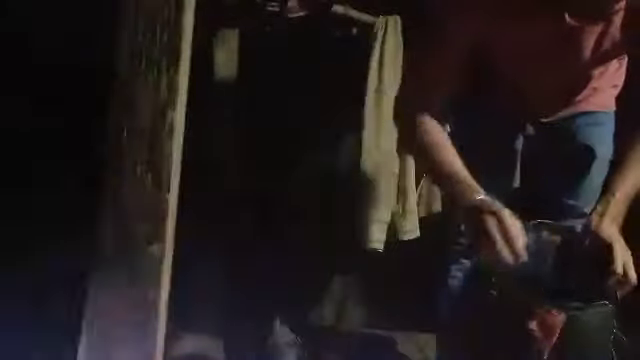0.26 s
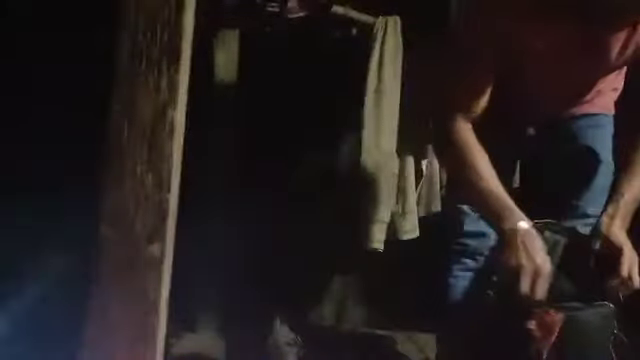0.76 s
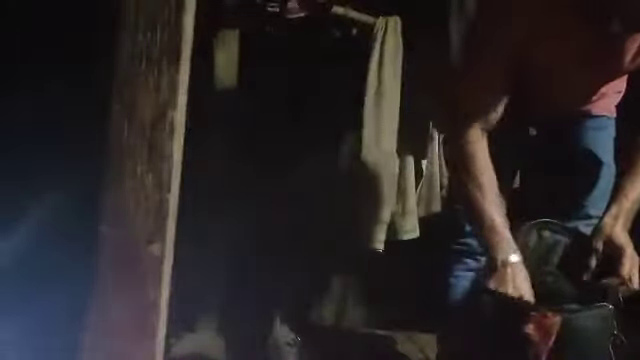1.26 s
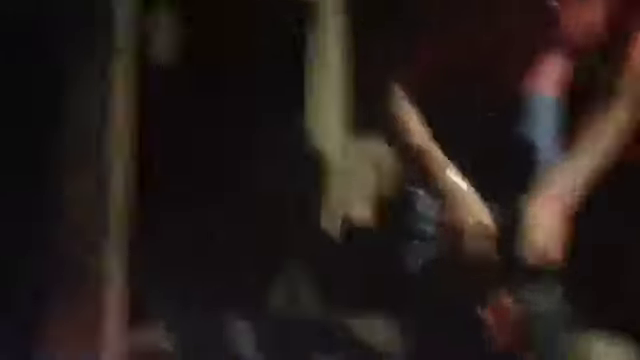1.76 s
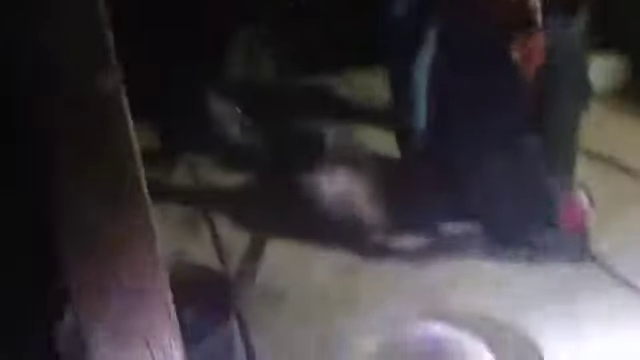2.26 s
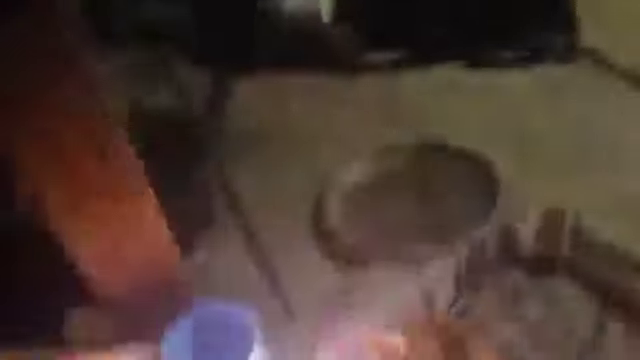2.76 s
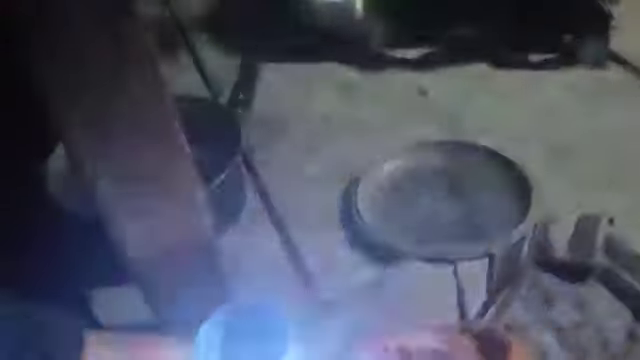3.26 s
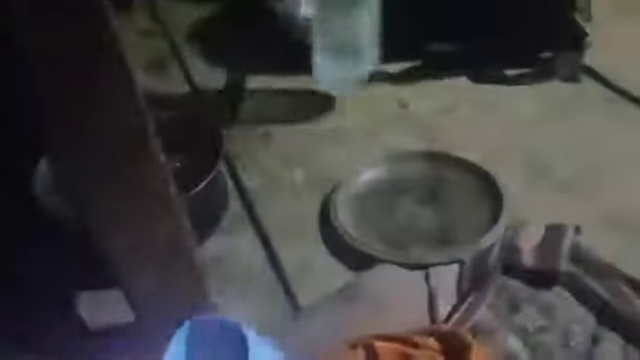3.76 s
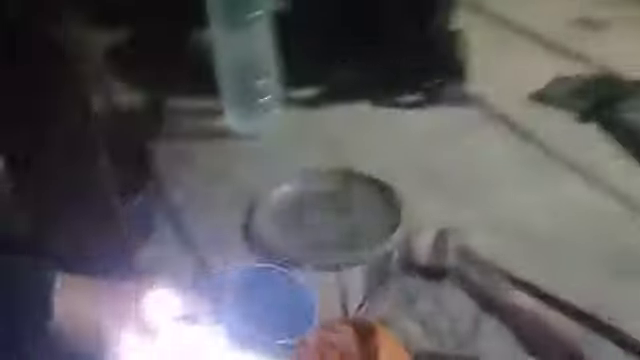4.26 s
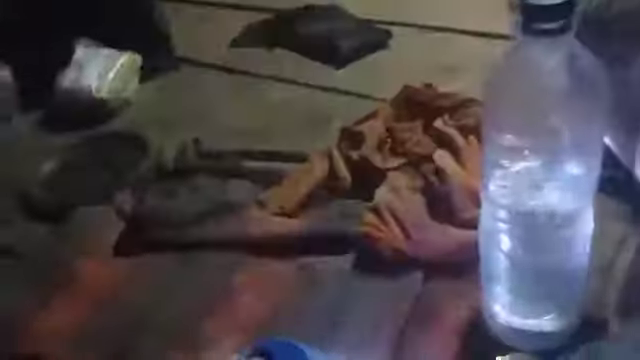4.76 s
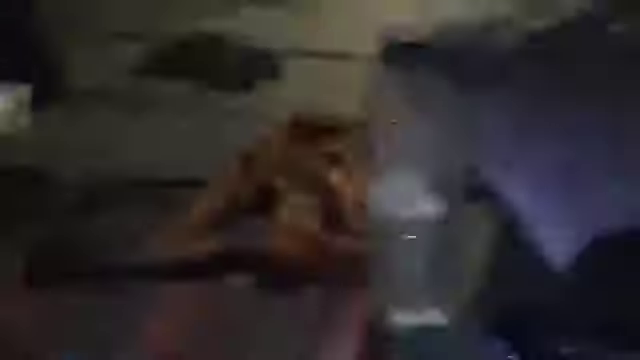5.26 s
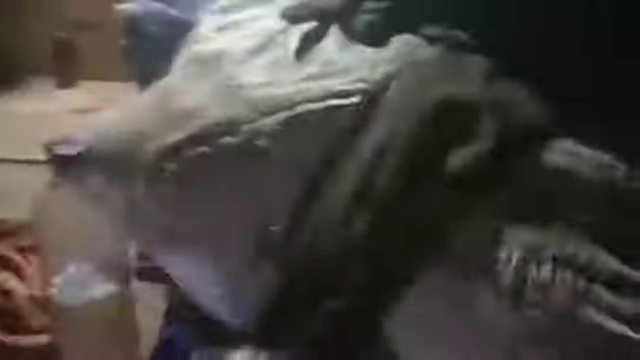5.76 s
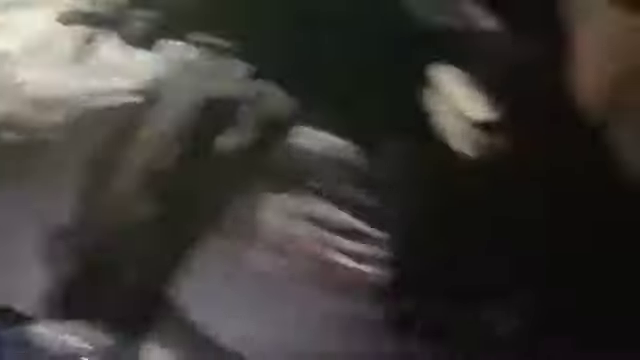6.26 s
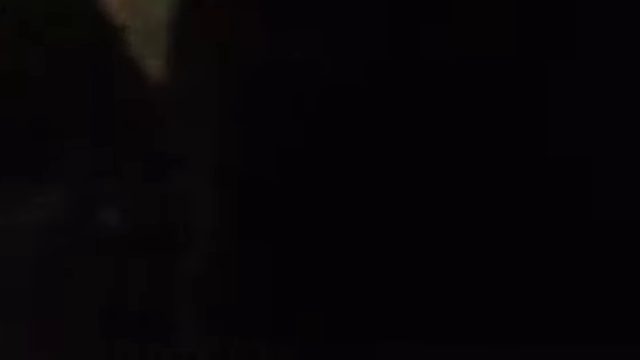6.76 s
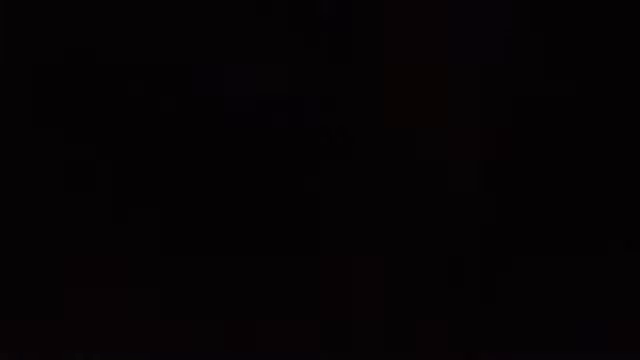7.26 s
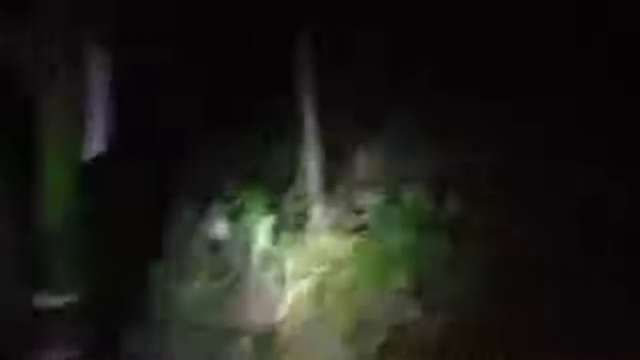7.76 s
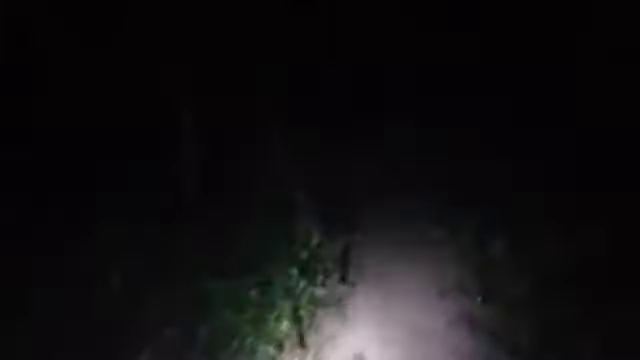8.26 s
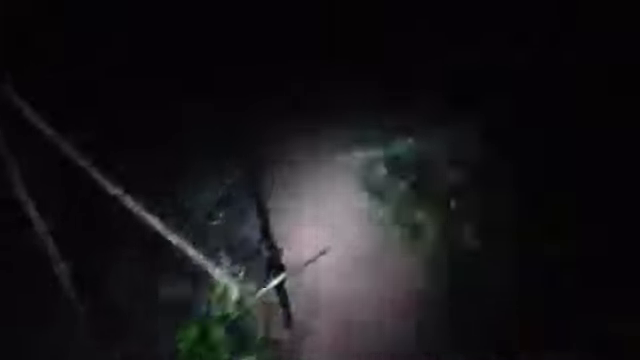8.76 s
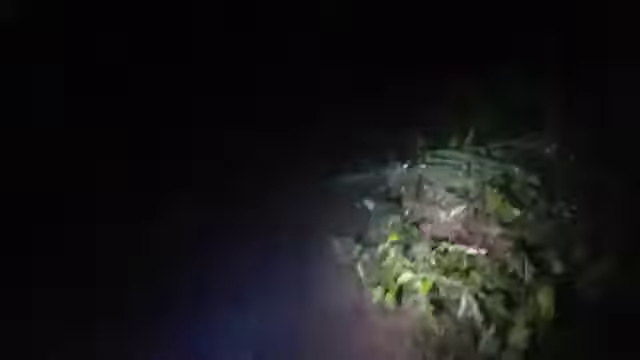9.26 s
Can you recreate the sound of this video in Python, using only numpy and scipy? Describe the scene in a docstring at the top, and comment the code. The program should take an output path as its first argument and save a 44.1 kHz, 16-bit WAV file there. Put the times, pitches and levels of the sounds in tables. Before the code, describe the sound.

A steady chorus of night insects continues behind small bumps on a hand-held microphone, cloth rustles, a metallic clack and a dull thump.

```python
"""Crickets at a forest hut by night

A chorus of wavering tones beats into a trill; half way through it gives way to a higher, quicker and
quieter one. Other crickets chirp in threes, each wing stroke a falling sweep. Close by, a bag and
clothes rustle by friction, feet scuff, and impacts set the wooden floor, a metal utensil and the case
of a hand-held camera ringing in their damped modes, while the hand rubs the case into a low rumble."""
import sys
import numpy as np
from scipy import signal
from scipy.fft import rfft, irfft, next_fast_len
from scipy.io import wavfile
from scipy.ndimage import uniform_filter1d

SR = 44100
rng = np.random.default_rng(int(sys.argv[2]) if len(sys.argv) > 2 else 0)


def inscribe(sig):
    """Save sig as 16-bit PCM at rate SR to the path in sys.argv[1].

    A 1-D sig is mono; a 2-D sig holds one channel per row.
    Samples are clipped to [-1, 1] before scaling.
    """
    pcm = np.round(np.clip(np.atleast_2d(sig).T, -1, 1) * 32767)
    wavfile.write(sys.argv[1], SR, pcm.astype(np.int16))


N = 418509
TIME = np.arange(N) / SR

# Steady tones of the low and the high chorus. Each row: frequency in Hz, relative level in dB.
LOW_TONES = [(1964, -61), (1979, -71), (2004, -64), (2027, -69), (2058, -68), (2116, -71), (2131, -62),
             (2147, -68), (2161, -54), (2176, -61), (2204, -64), (2218, -67), (2230, -69), (2256, -66),
             (2268, -67), (2279, -69), (2325, -65), (2342, -65), (2358, -65), (2375, -63), (2405, -66),
             (2419, -69), (2433, -72), (2538, -68)]
HIGH_TONES = [(2346, -71), (2400, -73), (2431, -76), (2459, -75), (2554, -67), (2568, -74), (2581, -70),
              (2609, -69), (2641, -68), (2653, -70), (2674, -73), (2692, -76), (2704, -71), (2720, -76),
              (2772, -71), (2786, -70), (2802, -69), (2816, -74), (2830, -76), (2846, -73), (2880, -72),
              (2894, -72), (2916, -77), (3033, -73)]
# Loudness of the chorus as the camera turns. Each row: time in seconds, gain in dB.
CHORUS_GAIN = [(0, -0.5), (.6, 0), (1.2, 0.5), (1.8, 0), (2.1, 2), (2.5, 4.5), (3, 3.5), (3.5, 2),
               (4.3, 3.5), (4.7, 0), (4.9, -3), (5.5, -3), (6.5, -2), (7.5, -1.5), (8.2, -0.5), (9, .5),
               (9.49, -2)]
# Spectra of the distant crickets and of the forest air that go with each chorus.
# Each row: frequency in Hz, relative spectral density in dB.
LOW_BLUR = [(1650, -40), (1850, -3), (2050, 2.5), (2280, 2), (2450, 0), (2600, -2), (2720, -8), (3200, -55)]
HIGH_BLUR = [(2000, -25), (2250, -2), (2460, 2.5), (2720, -3), (2950, 0.5), (3150, -4), (3350, -8.5),
             (3850, -38)]
LOW_CHORUS_AIR = [(25, -33), (60, -3.5), (115, 4.5), (180, 4), (280, -21), (600, -6), (1100, -6.5),
                  (1700, -3.5), (3300, -7), (3900, -12), (5200, 1), (6800, -10), (10000, -30.5),
                  (12500, -54)]
HIGH_CHORUS_AIR = [(25, -64), (70, -29), (140, 3.5), (220, 0.5), (350, -6), (700, 0.5), (1200, 0.5),
                   (2000, -1), (4000, -2.5), (4700, -6.5), (6200, 3.5), (8200, -8), (12000, -18),
                   (15500, -37)]
# Bouts of chirping, nearby and deeper in the trees.
# Each row: start, end and chirp period in seconds, relative level in dB, centre pitch in Hz.
NEAR_BOUTS = [(-.004, 2.06, .2264, -50.7, 5100), (2.31, 3.56, .2262, -49.6, 5100),
              (3.6345, 4.79, .2264, -49, 5100), (4.751, 6.92, .1905, -52.9, 6100),
              (7.012, 7.88, .1895, -53.6, 6100), (7.9295, 8.6, .1902, -53, 6100),
              (8.657, 9.26, .188, -52.8, 6120)]
FAR_BOUTS = [(.21, 3.6, .785, -57.5, 4570), (2.85, 3.3, .219, -57.5, 5780), (5.485, 8.8, 0.97, -53.5, 5450),
             (5.6, 7.2, .185, -61.5, 7020), (7.62, 9.9, .179, -57, 6960), (7.2, 9.45, .17, -64, 7980)]
# Knocks of fingers and nearby things on the case.
# Each row: start in seconds, relative ring level in dB, ring frequency in Hz, relative tick level in dB.
KNOCKS = [(.061, -39.5, 1065, -62), (.602, -43.5, 1080, -68), (0.923, -46, 710, -48.5),
          (1.095, -43, 940, -47), (1.146, -46, 930, -39.5), (1.294, -41.5, 1100, -57),
          (1.511, -34.5, 730, -52), (1.544, -36.5, 1080, -51), (1.829, -38, 816, -69),
          (2.031, -46, 1100, -52), (2.08, -48, 930, -50), (2.146, -50, 780, -53), (2.19, -47, 1300, -44.5),
          (2.307, -43, 1070, -49.5), (2.359, -36.5, 1050, -51), (2.496, -38.5, 1070, -45),
          (2.554, -50, 700, -47.5), (2.864, -54, 1110, -51), (3.024, -55, 990, -50.5),
          (3.639, -37, 1060, -55), (3.754, -48, 1110, -47.5), (4.291, -37, 685, -46), (4.34, -38, 860, -62),
          (4.428, -32.5, 894, -48.5), (4.605, -36, 844, -59), (4.694, -36, 840, -52.5),
          (5.714, -28.5, 1034, -50.5), (5.723, -40, 1030, -58), (5.778, -48, 1020, -51.5),
          (5.974, -42.5, 950, -58), (6.02, -43, 950, -60), (6.045, -28.5, 1045, -50.5),
          (6.134, -43, 950, -48), (6.166, -47, 990, -54), (6.233, -43.5, 1140, -61),
          (6.255, -56, 1000, -52), (6.635, -40.5, 997, -58), (6.813, -53, 970, -52.5),
          (6.873, -33, 980, -54), (6.979, -44, 1020, -49), (7.076, -41, 935, -60), (7.145, -46, 1390, -55),
          (7.173, -45, 890, -66), (7.193, -36, 916, -48), (7.196, -29.5, 927, -47.5),
          (7.2153, -26.5, 880, -53), (8.023, -46, 700, -60), (8.911, -47.5, 684, -54.5)]
# Hard things clacking together. Each row: start in seconds, peak level before reflections in dB.
CLACKS = [(3.1889, -17.5), (3.223, -33), (3.637, -22), (3.6406, -34), (6.134, -49), (6.9785, -41)]
# Blows on the floor and on the utensil. Each row: start in seconds, relative level in dB.
BUMPS = [(1.622, -48), (1.742, -44), (1.79, -45), (2.925, -56), (4.079, -28), (4.094, -34.5),
         (4.296, -36.5), (6.36, -53)]
CLINKS = [(3.188, -46), (3.223, -47.5)]
# Modes of the floor and of the utensil.
# Each row: frequency in Hz, relative level in dB, time to decay by 60 dB in seconds.
FLOOR_MODES = [(91, -14, 0.054), (118, 4, 0.071), (178, -7, 0.13), (274, -3, 0.057), (335.3, -5.5, 0.15),
               (383, -8.5, 0.12)]
UTENSIL_MODES = [(938, 4, 0.12), (3000, 2, 0.15), (3340, -9, .15), (6900, -15, 0.24), (7100, -6, 0.27),
                 (7740, -14, 0.18)]
# Scuffs of feet and palm. Each row: start in seconds, relative level in dB, centre frequency in Hz.
SCUFFS = [(.931, -52, 480), (.977, -48, 467), (1.093, -42, 392), (1.14, -45, 427), (1.478, -48, 650),
          (1.513, -43, 477), (1.544, -49, 400), (1.829, -50, 396), (3.333, -37, 505), (4.291, -32, 353),
          (4.816, -43.5, 267), (5.126, -46, 466), (5.43, -47.5, 433), (6.134, -46.5, 337),
          (6.24, -51.5, 500), (6.853, -45.5, 392), (6.874, -49, 440), (7.073, -49, 520),
          (7.452, -55.5, 436), (8.514, -50.5, 453), (8.91, -49, 520)]
# A sleeve brushing past. Each row: time of the peak in seconds, level in dB, length in seconds.
SWISHES = [(.02, -58.5, 0.048), (1.145, -51, 0.14), (1.42, -63, 0.26), (5.24, -58, 0.21), (5.467, -58, .11),
           (6.236, -53, 0.064), (7.991, -64, 0.28)]
# Strokes of cloth and fingers over the bag and the case.
# Each row: start and length in seconds, relative levels of rubbing and of crackle in dB.
RUSTLES = [(0.0, 0.037, -65, -55.5), (.23, 0.16, -62, -76), (0.595, 0.037, -57.5, -82),
           (0.913, 0.1, -58.5, -64), (1.094, .06, -50, -58), (1.151, 0.056, -57, -65),
           (1.282, 0.078, -57, -61), (1.465, .095, -54.5, -59), (1.58, .22, -67.5, -91),
           (1.995, 0.21, -62, -61.5), (2.287, 0.3, -63, -64), (2.876, 0.36, -63, -76),
           (3.19, 0.084, -56.5, -70), (3.756, 0.027, -59, -63), (4.071, 0.074, -53.5, -69),
           (4.255, .08, -55.5, -69), (4.426, 0.039, -57.5, -72), (4.587, 0.21, -66.5, -70),
           (5.1, 0.26, -67.5, -63), (5.7, 0.069, -67, -63), (5.88, .18, -64, -81), (6.132, .025, -57, -58),
           (6.208, 0.023, -58, -60), (6.765, 0.037, -58, -70), (6.84, 0.033, -51.5, -58.5),
           (6.967, 0.27, -65, -72), (7.795, .24, -65.5, -65.5), (8.02, 0.021, -66, -60),
           (8.233, 0.027, -62.5, -68), (8.477, 0.035, -63.5, -69), (8.696, 0.1, -72, -64)]
# Rumble of the grip, strongest as the camera swings. Each row: time in seconds, mean level in dB.
GRIP_LEVEL = [(0, -82), (.3, -65.5), (1.0, -66.5), (1.12, -58), (1.42, -66), (1.74, -53.5), (2.03, -71),
              (3.2, -67.5), (3.85, -77), (4.25, -60.5), (4.6, -61.5), (5.15, -75), (6.85, -73.5),
              (7.3, -86.5), (8.25, -75.5), (9.49, -80.5)]
# Spectra of the contact noises. Each row: frequency in Hz, relative spectral density in dB.
TICK_SPECTRUM = [(600, -43), (1400, 3.5), (2300, 10.5), (3600, 3.5), (6000, 3.5), (8000, 1.5), (11000, -17),
                 (15500, -30)]
CLACK_SPECTRUM = [(250, -12), (700, -6), (1100, 6), (2000, 0.5), (3500, -4), (5500, -5.5), (8000, -17),
                  (15000, -38)]
SWISH_SPECTRUM = [(1200, -31), (2800, 12), (4500, 1.5), (7500, 6.5), (10000, -2.5), (15000, -16)]
RUB_SPECTRUM = [(80, -16.5), (200, -2.5), (450, -1.5), (750, 1), (1000, 4.5), (1400, -3), (2200, -18.5),
                (2900, -5.5), (4000, -8), (8000, -67)]
CRACKLE_SPECTRUM = [(700, -8.5), (1800, 4.5), (2800, -3), (6500, 5), (8200, -1.5), (13000, -15),
                    (15400, -13)]
GRIP_SPECTRUM = [(25, -34), (60, -12), (110, 0), (175, 1), (260, -14.5), (600, -47.5)]


def trill(tones, waver_hz, flutter):
    """Beating: wavering tones of nearly equal frequency add up to a rough trill."""
    out = np.zeros(N)
    for hz, db in tones:
        cycles = np.cumsum(hz + waver_hz * drift(7)) / SR + rng.random()
        out += amp(db) * (1 + flutter * drift(9)) * np.sin(2 * np.pi * cycles)
    return np.sqrt(2) * out


def chorus(high_share):
    """Superposition: near crickets trill, while the many distant ones merge into a band of noise."""
    low_trill = trill(LOW_TONES, waver_hz=1.1, flutter=.17)
    high_trill = trill(HIGH_TONES, waver_hz=2.2, flutter=.28)
    low = amp(-2) * low_trill + amp(-60.5) * noise(LOW_BLUR)
    high = amp(1.66) * high_trill + amp(-63) * noise(HIGH_BLUR)
    return amp(curve(CHORUS_GAIN)) * ((1 - high_share) * low + high_share * high)


def chirps(bouts, sweep, rough_db, vary_db, stroke_cycles=112, step_cycles=189):
    """Stridulation, three strokes a chirp: the scraper slows along the file, so each falls in pitch."""
    out = np.zeros(N)
    for start, end, period, db, hz in bouts:
        progress = np.linspace(0, 1, round(stroke_cycles / hz * SR))
        for chirp_start in np.arange(start, end, period):
            strokes = chirp_start + np.arange(3) * step_cycles / hz
            for onset in strokes[strokes < end]:
                # the teeth catch unevenly, roughening both pitch and level
                catch = np.interp(progress, np.linspace(0, 1, 16), rng.standard_normal(16))
                pitch = hz * (1 + sweep * (.5 - progress) + .007 * catch)
                gain = amp(db + rough_db * catch[::-1] + vary_db * rng.standard_normal())
                add(out, onset, arch(progress) * gain * np.sin(2 * np.pi * np.cumsum(pitch) / SR))
    return out


def chirping_crickets():
    """Scattering: the trees add a diffuse tail to the near chirps and to the fainter far ones."""
    near = chirps(NEAR_BOUTS, sweep=.19, rough_db=2.2, vary_db=1.2)
    far = chirps(FAR_BOUTS, sweep=.107, rough_db=3.3, vary_db=3)
    scattered = amp(-2.5) * echoes(near, t60=.17) + amp(-7) * echoes(far, t60=.11)
    return amp(-2) * near + amp(-8) * far + scattered


def lone_insect(start=1.2, length_s=.24, db=-58, hz=2605):
    """Amplitude modulation: one thin, wavering note swells and fades just above the low chorus."""
    swell = arch(np.clip((TIME - start) / length_s, 0, 1))
    return swell * trill([(hz, db)], waver_hz=8, flutter=.3)


def case_knocks(tick_t60=.012, touches_per_s=4, touch_db=-60.5):
    """Heavy damping: a fingertip drives the case for a few hollow cycles; a nail or edge adds a tick."""
    out, t = np.zeros(N), np.arange(SR // 8) / SR
    touches = [(start, touch_db, 1000, touch_db + rng.normal(0, 2)) for start in moments(touches_per_s)]
    for start, ring_db, hz, tick_db in KNOCKS + touches:
        modes = [(hz, 0, .016), (hz * 1.07, -22, .05), (hz * .72, -9, .015), (hz * 1.45, -14, .012)]
        case = ring(modes, t, rise_s=.0025)
        tick = noise(TICK_SPECTRUM, size=len(t)) * amp(-60 * t / tick_t60)
        add(out, start, amp(ring_db + 8) * case + amp(tick_db + 8) * tick)
    return out + amp(-4) * echoes(out, t60=.044)


def clacks(chatter_t60=.024):
    """Hard impact: the first contact is a broadband impulse, followed by brief chatter."""
    out, t = np.zeros(N), np.arange(SR // 16) / SR
    lead = 64  # samples of silence keep the attack whole through the filter
    for start, db in CLACKS:
        contact = (t == 0) + .16 * rng.standard_normal(len(t)) * amp(-60 * t / chatter_t60)
        clack = colour(np.pad(contact, (lead, 0)), CLACK_SPECTRUM)
        add(out, start - lead / SR, amp(db) * clack / abs(clack).max())
    return out + amp(-12) * echoes(out, t60=.11)


def floor_bumps():
    """Resonance: heavy, slow blows excite the low modes of the boards, and the sound reverberates."""
    bumps = struck(BUMPS, FLOOR_MODES, rise_s=.009)
    return amp(-3) * bumps + amp(-11.5) * echoes(bumps, t60=.74)


def utensil_clinks():
    """Free vibration: a short tap leaves the metal ringing in its inharmonic modes."""
    return struck(CLINKS, UTENSIL_MODES, rise_s=.0003)


def scuffs(rise_s=.0069, faint_per_s=3, faint_db=-58, faint_hz=520):
    """Brief friction: feet and palm give dull puffs of noise; shifts of weight add faint random ones."""
    out = np.zeros(N)
    age = np.arange(SR // 8) / SR / rise_s  # in rise times
    faint = [(start, faint_db, faint_hz * 2 ** (rng.random() - .5)) for start in moments(faint_per_s)]
    for start, db, hz in SCUFFS + faint:
        band = [(hz / 9, -40), (hz / 3, -14), (hz, 0), (hz * 3, -28), (hz * 9, -70)]
        puff = noise(band, size=len(age)) * age * np.exp(1 - age)
        add(out, start, amp(db - 8) * puff)
    return out


def sleeve_swishes():
    """Sliding friction: smooth cloth gives an even hiss that swells and fades."""
    out = np.zeros(N)
    for peak_time, db, length in SWISHES:
        swell = np.hanning(round(length * SR))
        add(out, peak_time - length / 2, amp(db) * swell * noise(SWISH_SPECTRUM, size=len(swell)))
    return out


def rustle(attack_s=.0063, settle_t60=.18):
    """Stick-slip friction: cloth and fingers rub and crackle in tiny slips under one uneven pressure."""
    idle = amp(1.5 * drift(9))  # the grip never rests entirely
    rub_gain, crackle_gain = amp(-72.5) * idle, amp(-77.5) * idle
    for start, length, rub_db, crackle_db in RUSTLES:
        t = TIME - start
        attack = np.clip(t / attack_s, 0, 1)
        release = amp(-60 * np.clip((t - length) / settle_t60, 0, 2))
        rub_gain += amp(rub_db) * attack * release
        crackle_gain += amp(crackle_db) * attack * release
    pressure = amp(1.5 * drift(30) - 1.5)
    slips = grains(per_s=1500, spread_db=3)
    snaps = grains(per_s=3500, spread_db=2.5)
    rub = patchy(colour(slips, RUB_SPECTRUM), depth_db=4) * rub_gain
    crackle = patchy(colour(snaps, CRACKLE_SPECTRUM), depth_db=3.5) * crackle_gain
    return pressure * (rub + crackle)


def grip_rumble(spread_db=2.5):
    """Structure-borne sound: the hand shifts on the case in low, uneven lumps."""
    lumps = patchy(noise(GRIP_SPECTRUM), depth_db=4)
    return lumps * amp(curve(GRIP_LEVEL) + spread_db * drift(14))


def forest_air(high_share):
    """Ambient noise: a broad, wavering hush whose spectrum changes along with the chorus."""
    under_low = amp(-58.5) * patchy(noise(LOW_CHORUS_AIR), depth_db=3)
    under_high = amp(-62) * noise(HIGH_CHORUS_AIR)
    return ((1 - high_share) * under_low + high_share * under_high) * amp(1.7 * drift(6))


def ring(modes, t, rise_s):
    """Modal decay: each mode of a struck body swells during contact, then dies exponentially."""
    contact = 1 - np.exp(-t / rise_s)
    return contact * sum(amp(db - 60 * t / t60) * np.sin(2 * np.pi * hz * t) for hz, db, t60 in modes)


def struck(blows, modes, rise_s):
    """Linear response: every blow on one body gives the same ring, scaled by its strength."""
    out = np.zeros(N)
    response = ring(modes, np.arange(SR // 2) / SR, rise_s)
    for start, db in blows:
        add(out, start, amp(db) * response)
    return out


def echoes(x, t60):
    """Reverberation: diffuse reflections fall by 60 dB in t60 seconds."""
    t = np.arange(SR // 2) / SR
    tail = rng.standard_normal(len(t)) * amp(-60 * t / t60) * (t > .002)
    return signal.oaconvolve(x, tail / np.linalg.norm(tail))[:N]


def grains(per_s, spread_db):
    """Shot noise: random impulses of very unequal size, at rms 1."""
    size = amp(spread_db * np.minimum(rng.exponential(1, N), 4))
    return unit(size * rng.standard_normal(N) * (rng.random(N) < per_s / SR))


def patchy(x, depth_db):
    """Spectral modulation: patches of the spectrum rise and sink at random, as under changing contact."""
    spectra = signal.stft(x, nperseg=1024, noverlap=768)[2]
    patches = rng.standard_normal(spectra.shape)
    for _ in range(2):
        patches = uniform_filter1d(patches, size=7, axis=0)  # across frequency
        patches = uniform_filter1d(patches, size=9, axis=1)  # across time
    spectra *= amp(depth_db * unit(patches))
    return unit(signal.istft(spectra, nperseg=1024, noverlap=768)[1][:N])


def colour(x, points):
    """Filtering: shapes x by a curve of (Hz, dB) points, at rms 1."""
    size = next_fast_len(len(x))
    hz, db = np.transpose(points)
    log_hz = np.log(np.fft.rfftfreq(size, 1 / SR) + 1)
    gain = amp(np.interp(log_hz, np.log(hz), db))
    return unit(irfft(rfft(x, size) * gain, size)[:len(x)])


def noise(points, size=N):
    """Coloured noise at rms 1."""
    return colour(rng.standard_normal(size), points)


def drift(rate):
    """A random fluctuation of rms 1 that changes about rate times a second."""
    steps = rng.standard_normal(4096)
    return unit(np.interp(TIME * rate, np.arange(len(steps)), steps))


def moments(per_s):
    """Random times, per_s a second on average."""
    return rng.random(round(per_s * N / SR)) * N / SR


def arch(progress):
    """A rounded envelope that rises and falls as progress runs from 0 to 1."""
    return np.sqrt(abs(np.sin(np.pi * progress)))


def curve(rows):
    """Linear interpolation of (seconds, value) rows."""
    return np.interp(TIME, *np.transpose(rows))


def amp(db):
    """Decibels to gain."""
    return 10 ** (np.asarray(db) / 20)


def unit(x):
    """Normalisation to rms 1."""
    return x / np.sqrt(np.mean(x ** 2) + 1e-20)


def add(mix, start, sound):
    """Mixes a sound in at start seconds."""
    part = mix[max(round(start * SR), 0):][:len(sound)]
    part += sound[:len(part)]


def scene(change_s=4.77, crossfade_s=.07):
    """Superposition: insects and air all around and small noises close by sum in one channel."""
    high_share = np.clip((TIME - change_s) / crossfade_s + .5, 0, 1)
    forest = chorus(high_share) + forest_air(high_share) + chirping_crickets() + lone_insect()
    impacts = floor_bumps() + utensil_clinks() + case_knocks() + clacks()
    friction = scuffs() + sleeve_swishes() + rustle() + grip_rumble()
    return (forest + impacts + friction)[None]


def record(dry, bass_hz=45, edge_hz=15600):
    """Band limiting: the small microphone loses the deep bass, and a steep low-pass cuts the top."""
    thin = signal.sosfilt(signal.butter(2, bass_hz, "highpass", fs=SR, output="sos"), dry)
    lowpass = signal.firwin(511, edge_hz, window=("kaiser", 9), fs=SR)
    return signal.oaconvolve(thin, lowpass[None], "same")


dry = scene()
out = record(dry)
inscribe(out)
```